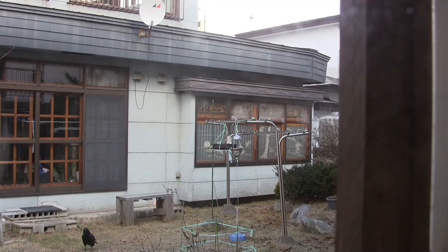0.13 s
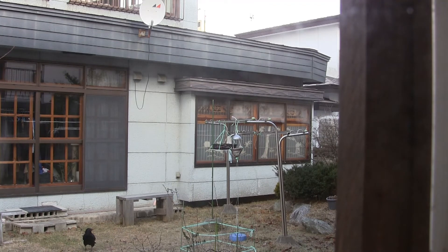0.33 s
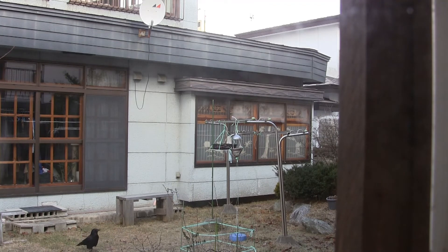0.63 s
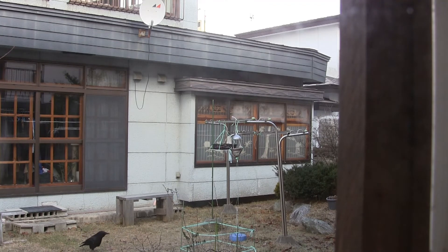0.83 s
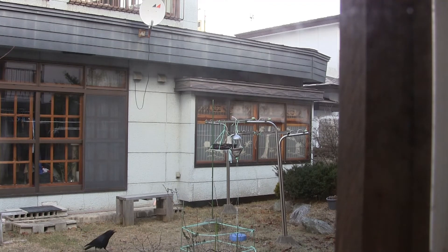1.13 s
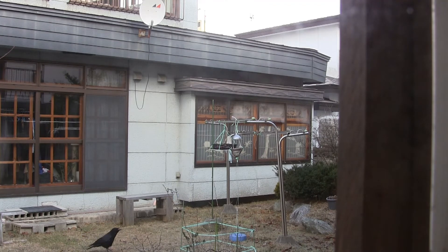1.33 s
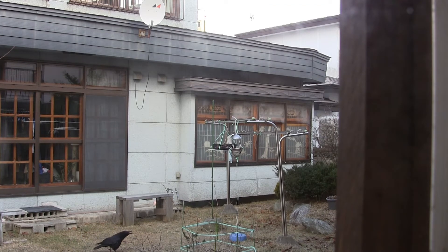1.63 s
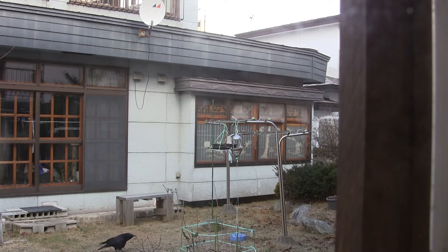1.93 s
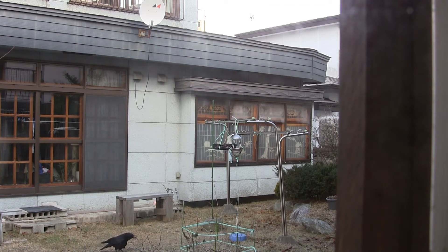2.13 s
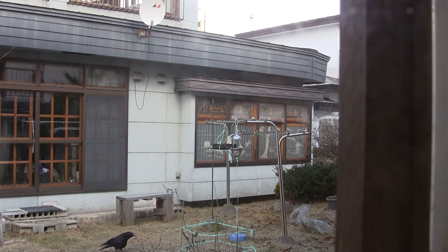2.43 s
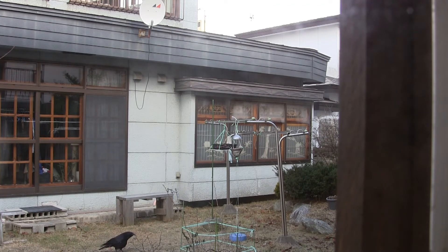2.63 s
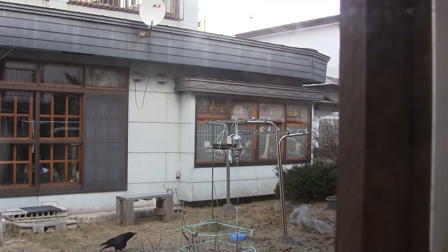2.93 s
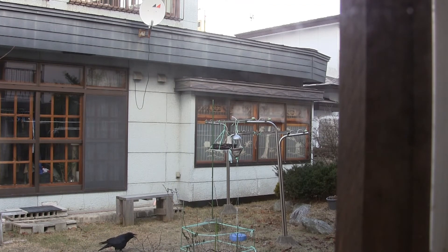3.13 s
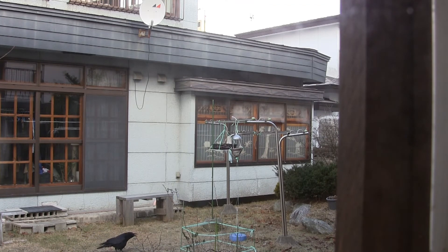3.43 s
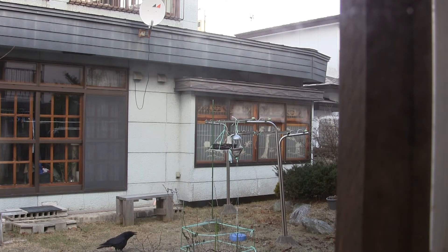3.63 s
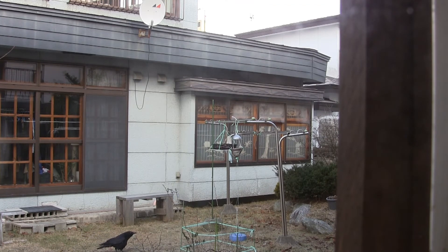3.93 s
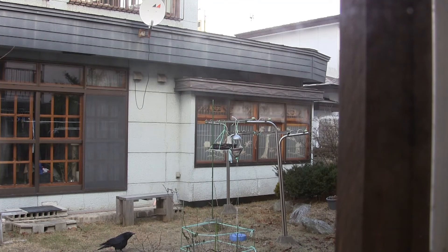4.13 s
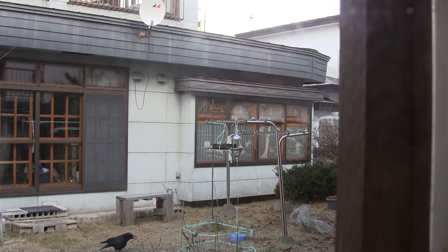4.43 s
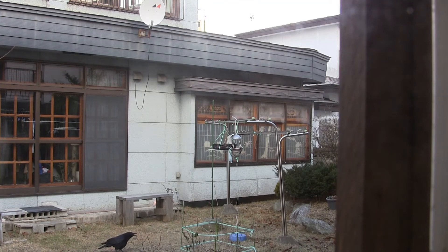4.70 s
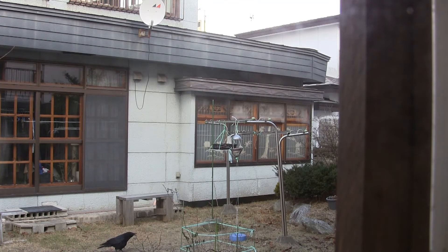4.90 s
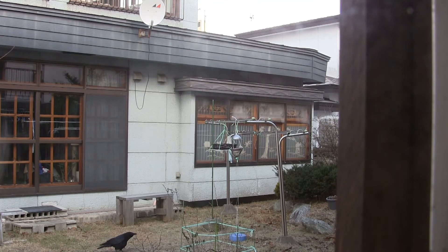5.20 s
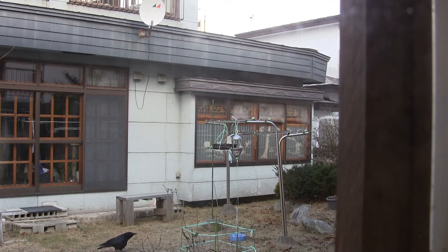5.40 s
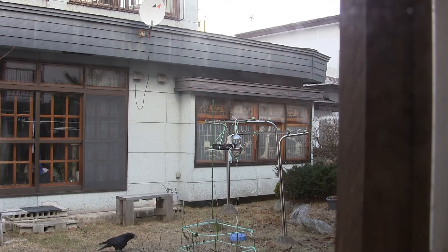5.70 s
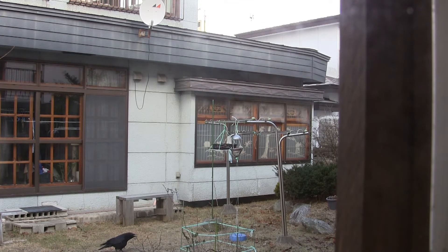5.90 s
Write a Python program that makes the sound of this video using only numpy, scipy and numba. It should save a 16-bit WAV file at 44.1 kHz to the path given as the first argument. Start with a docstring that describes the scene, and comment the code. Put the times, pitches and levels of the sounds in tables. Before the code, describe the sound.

A crow on the ground gives five loud, rough, falling caws about a second apart in a small walled yard, over faint town rumble.

```python
"""A crow on the ground caws five times in a small yard between house walls.
Two sides of its syrinx vibrate at different pitches and chop each other's pulses: a rough, falling voice.
Throat and beak resonances filter the pulses and a high rasp; impulse responses add wall ringing and echoes.
Behind lies a quiet town: coloured noise as wash and slowly growing rumble, and wavering sines as hum."""
import sys
import numpy as np
from scipy import signal
from scipy.fft import rfft, irfft, next_fast_len
from scipy.io import wavfile
from scipy.ndimage import uniform_filter1d
from numba import njit

SR = 44100
rng = np.random.default_rng(int(sys.argv[2]) if len(sys.argv) > 2 else 0)


def waveform_to_disk(signal):
    """Save audio, clipped to [-1, 1], as 16-bit WAV at the path in sys.argv[1]."""
    frames = np.transpose(np.atleast_2d(signal))
    scaled = np.clip(frames, -1, 1) * 32767
    samples = np.round(scaled).astype(np.int16)
    wavfile.write(sys.argv[1], SR, samples)


N = 267113
TIME = np.arange(N) / SR
SIZE = next_fast_len(N + SR // 2, real=True)
FREQ = np.maximum(np.arange(SIZE // 2 + 1) * SR / SIZE, 1)

# caws: (start [s], length [s], level before the yard [dB], swell at the start [dB], lower pitch [Hz],
# pitch hold [s], sag after it [Hz/s], roughness [0-1], throat dip [Hz], time of deepest dip [s],
# beak resonance at the start [Hz], beak opening time [s],
# upper throat level [dB], beak level [dB], rasp level [dB])
CAWS = [(1.296, .575, -13.4, 26, 371, .13, 164.8, 0.61, 109.4, 0.31, 2890, 0.077, -2, -17.5, -24),
        (2.203, 0.66, -14.5, 17, 354.4, .08, 74.66, 0.67, 68.5, 0.29, 2815, 0.015, -1, -14.5, -21.5),
        (3.223, .705, -17, 19, 346.9, .06, 45, .54, 290, .4, 2680, 0.1, -2, -15.5, -24.5),
        (4.457, 0.73, -14.5, 11, 362.5, .31, 150.5, 0.34, 290, .23, 3110, 0.03, -3.5, -14, -22),
        (5.76, .65, -15, 17.5, 360.9, .17, 150, 0.5, 60, 0.22, 2710, 0.014, -1, -13, -20.5)]
# partials and sum tones of the two sides: (multiple of lower pitch, multiple of upper pitch, level [dB])
PARTIALS = [(1, 0, -39), (0, 1, -35.5), (2, 0, -18.5), (1, 1, -21), (3, 0, -15), (2, 1, -4.5), (1, 2, -10),
            (3, 1, 0), (4, 1, -5)]
# resonances of the throat: (frequency [Hz], relative level [dB])
THROAT = [(150, -74.5), (285, -33), (355, -37.5), (470, -18), (640, -21), (760, -21), (900, -3.5),
          (1120, 5.5), (1440, -1), (1620, 3.5), (1740, -16.5), (2000, -47), (3500, -87)]
# resonances of the upper throat: (frequency [Hz], relative level [dB])
UPPER_THROAT = [(1000, -59), (1550, -19), (1690, 0), (1820, 5), (1970, -1), (2080, -11), (2300, -7.5),
                (3500, -73)]
# fixed part of the beak's colour: (frequency [Hz], relative level [dB])
BEAK_BASE = [(1500, -33), (2050, -3.5), (2270, -0.5), (2430, -16), (2650, -15), (2900, -16.5), (3500, -24),
             (5000, -46.5)]
# colour of the high rasp: (frequency [Hz], relative level [dB])
RASP = [(2500, -31), (3300, -11.5), (4200, -2), (4850, -3.5), (5450, 0), (6100, -1.5), (6800, -6),
        (7700, -14), (8600, -15), (10500, -25.5), (15000, -55)]
# standing waves and cancellations between the walls: (frequency [Hz], width [Hz], lift [dB])
YARD_MODES = [(304.6, 24, 14.5), (576.5, 19, 11.5), (650, 6, 1.5), (700, 65, -2), (888, 6.4, 15.5),
              (916, 61, -14.5), (954.6, 17, 4), (1063.4, 40, -18), (1168.6, 16, 11.5), (1245, 15, -2.5),
              (1304, 33, -10.5), (1381, 19, 5.5), (1473, 30, 1.5), (1539, 23, 1), (1657, 36, -9),
              (1752, 22, 9.5), (1920, 17, 0), (1912, 13, 6.5), (2660, 50, 2), (2658, 69, 5), (5524, 90, 8),
              (5980, 130, 4.5)]
# early wall echoes: (delay [s], level against the direct sound [dB])
ECHOES = [(0.0105, -7.5), (0.0235, -8.5), (.0345, -18.5), (.0580, -12.5)]
# colour of the far houses' tail: (frequency [Hz], gain [dB])
FAR_COLOUR = [(1000, 3.5), (1480, 6.5), (2200, 7.5), (6000, 8.0), (12000, -27.0)]
# left-right difference of the reverberation: (frequency [Hz], gain [dB])
YARD_SIDE = [(600, -1.0), (1400, -7.5), (2200, 0.5), (5000, 1.5)]
# colour of the distant town's wash: (frequency [Hz], relative level [dB])
TOWN_WASH = [(20, -14.5), (50, -22.5), (75, -5), (130, -10.5), (330, -6), (600, -10), (1100, -10.5),
             (1600, -13), (2300, -16.5), (4000, -18), (6000, -21.5), (9000, -25.5), (13500, -30),
             (16000, -34.5)]
# left-right difference of the wash: (frequency [Hz], gain [dB])
WASH_SIDE = [(70, -14.5), (200, -2.5), (1500, -5), (12000, -5.5)]
# colour of the town's rumble: (frequency [Hz], relative level [dB])
RUMBLE = [(20, -34), (70, -9), (130, -6), (240, 0), (450, -5), (900, -12), (3000, -24), (12000, -45)]
# faint hum of far machinery: (frequency [Hz], central rms level [dB])
HUM = [(182, -65), (1015, -65.5), (2930, -70)]

# the upper side sings a fixed step higher; both scoop up into a caw and drop as the air runs out
SIDE_STEP_HZ, SCOOP_HZ, SCOOP_S, DROP_HZ, DROP_S = 89, 14, .04, 26, .055
# the voice starts harsh and settles
ONSET_ROUGH, SETTLE_S = 0.31, 0.095
# the throat resonance dips for a while in each caw; the beak resonance sinks to its rest
THROAT_HZ, DIP_S, BEAK_REST_HZ, BEAK_SINK_S = 1479, 0.12, 2510, 0.16
# the upper throat fills in quickly; the beak opens on the treble, which tires less than the throat
FILL_DB, FILL_S, SHUT_DB, BEAK_LATE_DB, RASP_LATE_DB = 12.5, 0.11, 5.5, 9.5, 3.5
# loudness swells, holds, tires towards the end and is cut off
SWELL_S, TIRE_DB, TIRE_S, ATTACK_S, RELEASE_S = 0.099, 7, 0.14, 0.0024, .012
# upper throat, beak and rasp dim as the caw goes on
DIM_DB_PER_S = 4
# levels of the town's wash and of its rumble at the start, and the growth of the rumble
WASH_DB, RUMBLE_DB, RUMBLE_DB_PER_S = -52, -64.5, 2.58
TOP_HZ = 15750
# adds a side signal to the left channel and subtracts it from the right
APART = np.array([[1], [-1]])


def crow(throat_db=-1.0, hollow_db=-5.0, hollow_width_hz=310, tone_lift_db=3, base_db=-3, beak_width_hz=420,
         rasp_voice=0.062, pinch_hz=5160, pinch_width_hz=420, pinch_db=6, pinch_s=0.085):
    """Source-filter principle: syrinx pulses excite throat, falling beak resonance and a pinched, opening rasp."""
    age, left, columns = current_caw()
    (level_db, swell_db, pitch_hz, hold_s, sag, rough, dip_hz, dip_at_s,
     beak_hz, open_s, upper_db, beak_db, rasp_db) = columns
    sung = np.clip(age, 0, age + left)
    sagged_hz = sag * np.maximum(sung - hold_s, 0)
    low_hz = pitch_hz - SCOOP_HZ * fade(age, SCOOP_S) - sagged_hz - DROP_HZ * fade(left, DROP_S)
    roughness = np.clip(rough + ONSET_ROUGH * fade(age, SETTLE_S), 0, 1)
    voice, hiss, tones = syrinx(low_hz, roughness)

    # the moving throat resonance lifts whichever partial lies under it
    throat_hz = THROAT_HZ - dip_hz * fade(((sung - dip_at_s) / DIP_S) ** 4, 1)
    hollow = undb(hollow_db) * formant(voice, throat_hz, hollow_width_hz)
    hollow += undb(tone_lift_db) * resonance(tones, throat_hz, float(hollow_width_hz))
    throat = undb(throat_db) * unit(shape(voice, THROAT)) + hollow + tones
    upper = unit(shape(voice, UPPER_THROAT)) * undb(upper_db - FILL_DB * fade(age, FILL_S))

    gliding_hz = BEAK_REST_HZ + (beak_hz - BEAK_REST_HZ) * fade(age, BEAK_SINK_S)
    gliding = formant(voice, gliding_hz, beak_width_hz)
    beak = unit(gliding + undb(base_db) * unit(shape(voice, BEAK_BASE)))

    rasp = unit(shape(hiss + rasp_voice * voice, RASP))
    pinch = undb(pinch_db) * fade(age, pinch_s)
    rasp = (rasp + pinch * formant(rasp, pinch_hz, pinch_width_hz)) / np.sqrt(1 + pinch ** 2)

    tired = fade(left, TIRE_S)
    shut = fade((sung / open_s) ** 4, 1)
    treble = beak * undb(beak_db + BEAK_LATE_DB * tired) + rasp * undb(rasp_db + RASP_LATE_DB * tired)
    treble *= undb(-SHUT_DB * shut)
    effort = undb(level_db - swell_db * np.maximum(1 - sung / SWELL_S, 0) - TIRE_DB * tired)
    gate = np.clip(age / ATTACK_S, 0, 1) * fade(-left, RELEASE_S)
    return gate * effort * (throat + (upper + treble) * undb(-DIM_DB_PER_S * sung))


def current_caw():
    """Piecewise control: per sample, time since the latest caw began, time until it ends, rest of its row."""
    rows = np.array(CAWS)
    latest = np.maximum(np.searchsorted(rows[:, 0], TIME) - 1, 0)
    start, length, *columns = rows[latest].T
    return TIME - start, start + length - TIME, columns


def syrinx(low_hz, rough, jitter=0.01921, slip=0.094, shimmer_db=0.8, coupling=0.53, upper_db=-6, air=0.37,
           wander=.008, surge_db=2.5):
    """Coupled oscillators: two membrane pairs share one airflow, so each chops the other's pulses.

    Returns voice, gated air and clear tones."""
    tremor = 1 + 0.00324 * walk(35) + wander * walk(14)
    # single closures come early or late: the low partials stay clear, the high ones smear
    low, high = (np.cumsum(hz * tremor * (1 + jitter * rough * walk(200))) / SR
                 for hz in (low_hz, low_hz + SIDE_STEP_HZ))

    # each clear partial surges and sinks on its own
    tones = np.zeros(N)
    for low_multiple, high_multiple, db in PARTIALS:
        turns = round(low_multiple) * low + round(high_multiple) * high
        tones += undb(db + surge_db * walk(13)) * np.sqrt(2) * np.sin(2 * np.pi * turns)

    low, high = (phase + slip * rough * walk(350) for phase in (low, high))
    low_open, high_open = (np.exp(coupling * (.5 + rough) * np.cos(2 * np.pi * phase))
                           for phase in (low, high))
    voice = unit(pulses(low) * high_open + undb(upper_db) * pulses(high) * low_open)
    hiss = unit(rng.standard_normal(N) * (low_open + high_open))
    stutter = unit(undb(shimmer_db * rough * np.tanh(walk(170))))
    clarity = (1 - rough) ** 2
    breathy_voice = (voice + air * rough * hiss) / np.sqrt(1 + (air * rough) ** 2)
    return stutter * breathy_voice, stutter * hiss, clarity * tones


def pulses(phase):
    """Impulse excitation: one click per turn of the phase, shared between two samples."""
    at = np.flatnonzero(np.diff(np.floor(phase)) > 0)
    late = (phase[at + 1] % 1) / (phase[at + 1] - phase[at])
    out = np.zeros(N)
    out[at], out[at + 1] = late, 1 - late
    return out


def formant(x, hz, width_hz):
    """Cascaded resonance: two equal moving band-passes give steeper flanks, scaled to rms 1."""
    hz = hz + np.zeros(N)
    once = resonance(x, hz, float(width_hz))
    return unit(resonance(once, hz, float(width_hz)))


@njit
def resonance(x, hz, width):
    """State-variable resonance: two integrators form a band-pass whose centre moves."""
    out, band, low = np.empty(len(x)), 0., 0.
    for i in range(len(x)):
        g, damping = np.tan(np.pi * hz[i] / SR), width / hz[i]
        v = (band + g * (x[i] - low)) / (1 + g * (g + damping))
        band, low, out[i] = 2 * v - band, low + 2 * g * v, damping * v
    return out


def fade(s, time_s):
    """Exponential decay: falls from 1 towards 0 as s grows past zero."""
    return np.exp(-np.clip(s / time_s, 0, 50))


def walk(rate, size=4096):
    """Random modulation: smooth chance with rms 1 that takes rate new values a second."""
    return unit(np.interp(TIME * rate, np.arange(size), rng.standard_normal(size)))


def undb(db):
    """Logarithmic level: decibels to amplitude gain."""
    return 10 ** (np.asarray(db) / 20)


def unit(x):
    """Normalization: scale to rms 1."""
    return x / np.sqrt(np.mean(x ** 2))


def spectrum(points):
    """Spectral envelope: (frequency [Hz], level [dB]) points joined on a log-frequency axis."""
    hz, db = np.transpose(points)
    return np.interp(np.log(FREQ), np.log(hz), db)


def shape(x, points):
    """Zero-phase filtering: broad colouring by (frequency [Hz], level [dB]) points."""
    return irfft(rfft(x, SIZE) * undb(spectrum(points)), SIZE)[..., :N]


def colour(x, db):
    """Minimum-phase filtering: a causal filter with the given gains, whose narrow peaks ring on."""
    # folding the cepstrum onto positive time makes the filter causal
    cepstrum = irfft(db * np.log(10) / 20, SIZE)
    cepstrum[1:SIZE // 2] *= 2
    cepstrum[SIZE // 2 + 1:] = 0
    return irfft(rfft(x, SIZE) * np.exp(rfft(cepstrum)), SIZE)[..., :N]


def yard(x, scatter_db=-1.0, scatter_t60=0.21, far_db=-17, far_t60=0.86, far_wall_s=0.1, far_wall_db=-20,
         width=0.41, gain_db=-5.5):
    """Reverberation by convolution: direct sound, wall echoes and scatter ring; far houses add echo and tail."""
    response = np.zeros((2, N))
    response[:, 0] = 1
    for delay_s, db in ECHOES:
        response[:, int(delay_s * SR)] += undb(db)

    near = scattered_tail(scatter_t60, scatter_db)
    far = scattered_tail(far_t60, far_db)
    far[0, int(far_wall_s * SR)] += undb(far_wall_db)
    far = shape(far, FAR_COLOUR)
    # rows change from mid and side to left and right
    near, far = (mid + width * shape(side, YARD_SIDE) * APART for mid, side in (near, far))

    ringing_db = sum(db / (1 + (2 * (FREQ - hz) / wide) ** 2) for hz, wide, db in YARD_MODES)
    response = colour(response + near, ringing_db) + far
    return signal.fftconvolve(x[None], response[:, :SR], axes=1)[:, :N] * undb(gain_db)


def scattered_tail(t60, db):
    """Diffuse reflection: exponentially decaying noise as mid and side, falling 60 dB in t60 seconds."""
    decay = undb(-60 * np.minimum(TIME / t60, 2)) * (TIME > .002)
    return undb(db) * unit(rng.standard_normal((2, N)) * decay) / np.sqrt(N)


def town():
    """Superposition of distant sources: an even wash, a slowly growing low rumble and a wavering hum."""
    mid, side = shape(rng.standard_normal((2, N)), TOWN_WASH)
    wash = (mid + shape(side, WASH_SIDE) * APART) * undb(WASH_DB) / np.std(mid)

    low_mid, low_side = unit(shape(rng.standard_normal((2, N)), RUMBLE))
    rumble_gain = undb(RUMBLE_DB + RUMBLE_DB_PER_S * TIME + 0.43 * walk(2.6))
    rumble = (low_mid + 0.21 * low_side * APART) * rumble_gain

    hum = np.zeros(N)
    for hz, db in HUM:
        turns = np.cumsum(hz * (1 + 0.0097 * walk(60))) / SR
        hum += undb(db + 2 * walk(18.0)) * np.sqrt(2) * np.sin(2 * np.pi * turns)
    return wash + rumble + hum


def scene(pan_db=0.24):
    """Level-difference stereo: the crow stands a little to the left, before the town."""
    return yard(crow()) * undb([[pan_db], [-pan_db]]) + town()


def record(dry, limit_db=-14.5, limit_s=.012, squeeze=0.46):
    """Dynamic compression: loud moments are held down, the highest peaks rounded and the top cut."""
    power = uniform_filter1d(np.mean(dry ** 2, axis=0), max(int(limit_s * SR), 1))
    held = dry * np.maximum(power / undb(limit_db) ** 2, 1) ** (-squeeze / 2)
    rounded = held / (1 + (held / .95) ** 8) ** (1 / 8)
    low_pass = signal.ellip(10, .1, 80, TOP_HZ, fs=SR, output="sos")
    return signal.sosfilt(low_pass, rounded)


dry = scene()
out = record(dry)
waveform_to_disk(out)
```